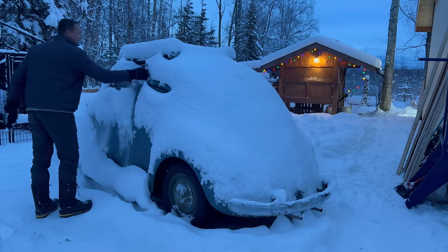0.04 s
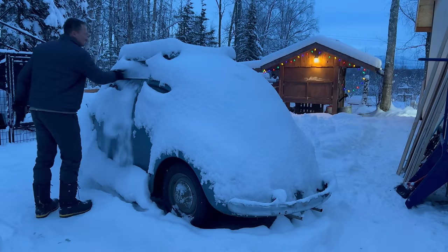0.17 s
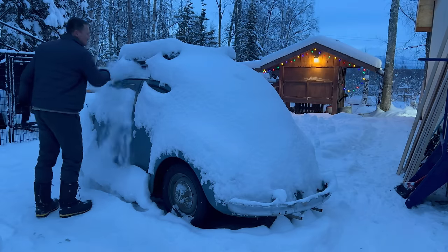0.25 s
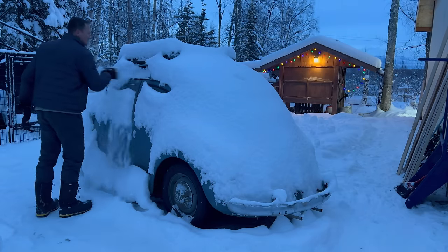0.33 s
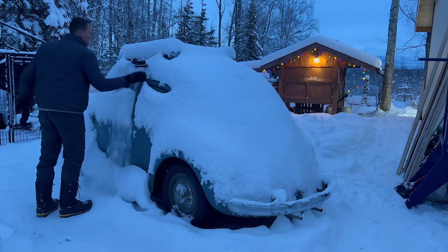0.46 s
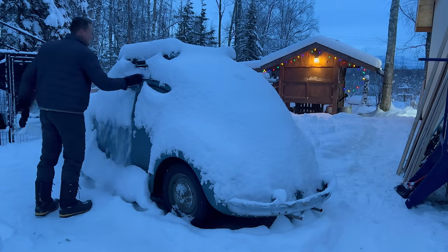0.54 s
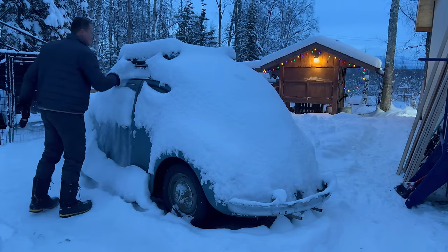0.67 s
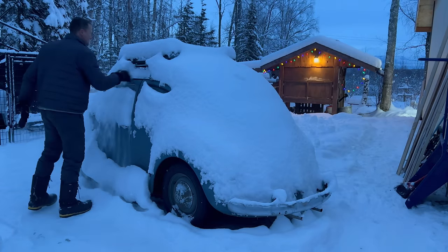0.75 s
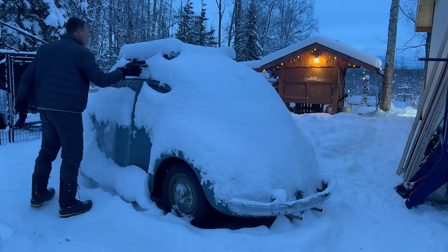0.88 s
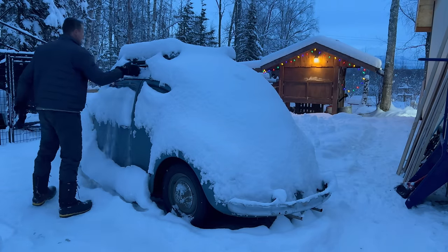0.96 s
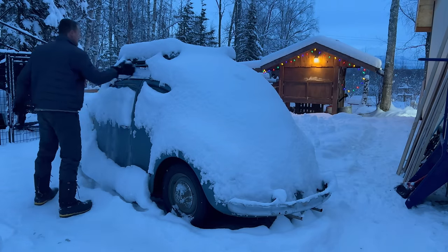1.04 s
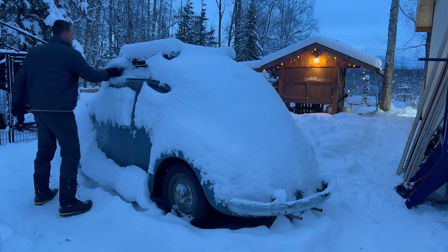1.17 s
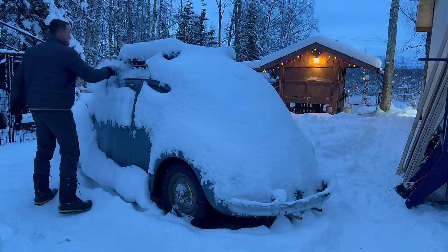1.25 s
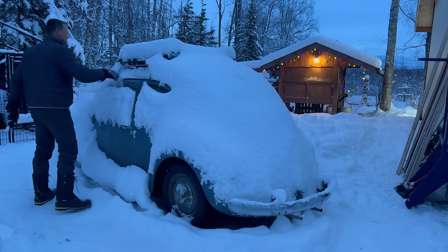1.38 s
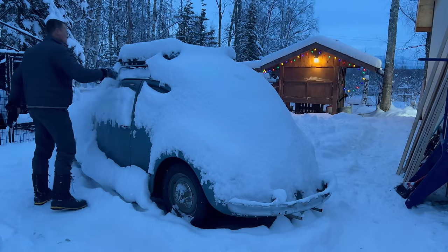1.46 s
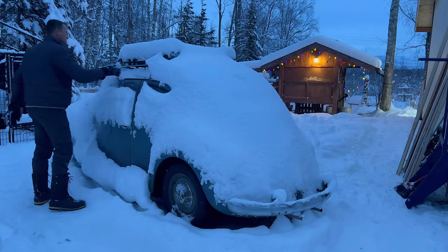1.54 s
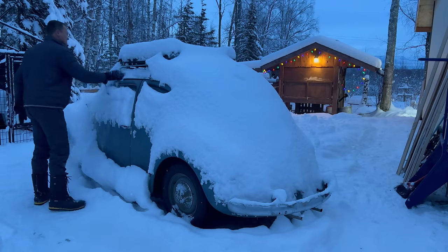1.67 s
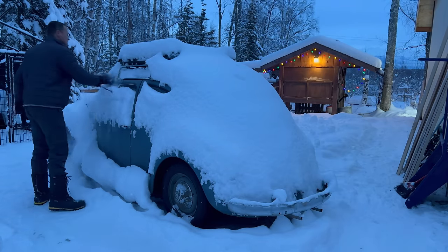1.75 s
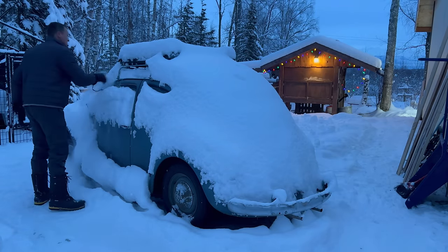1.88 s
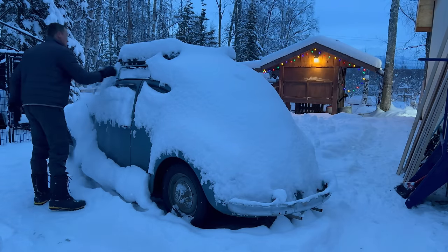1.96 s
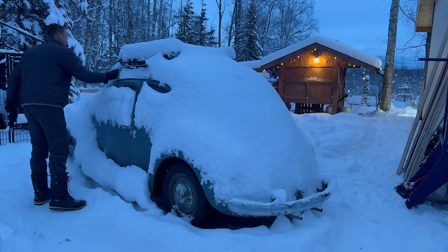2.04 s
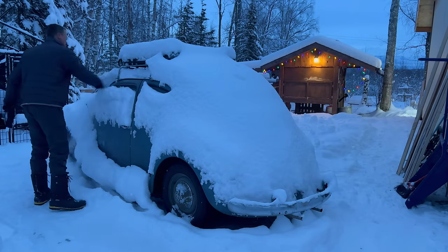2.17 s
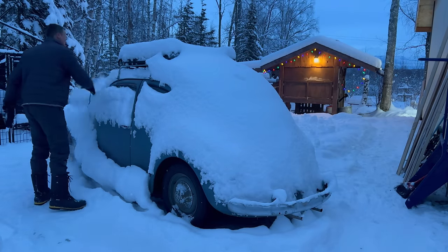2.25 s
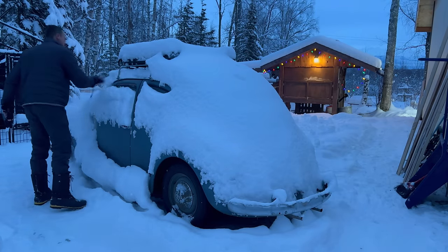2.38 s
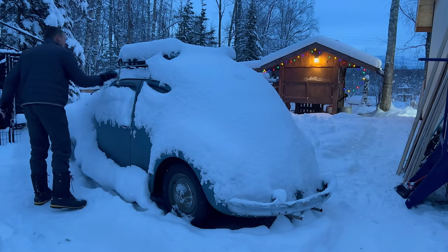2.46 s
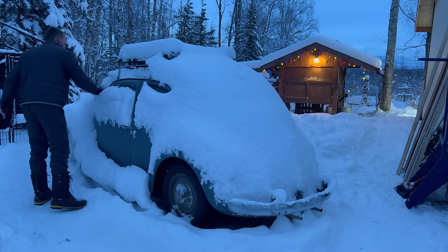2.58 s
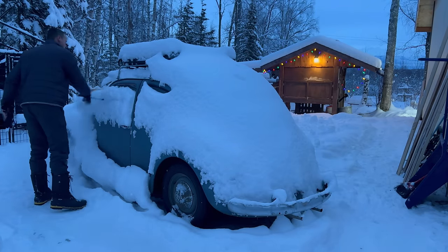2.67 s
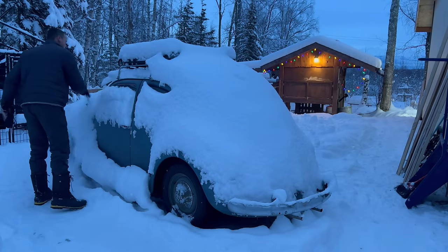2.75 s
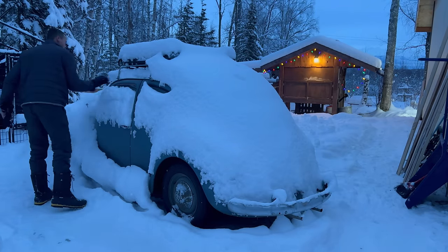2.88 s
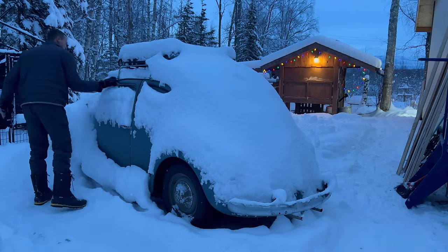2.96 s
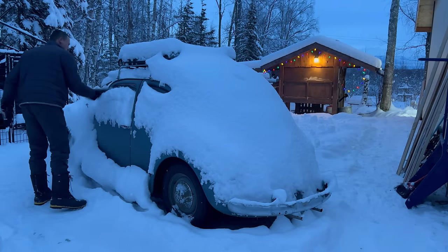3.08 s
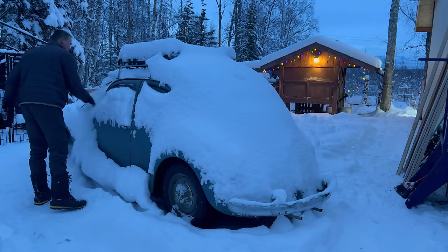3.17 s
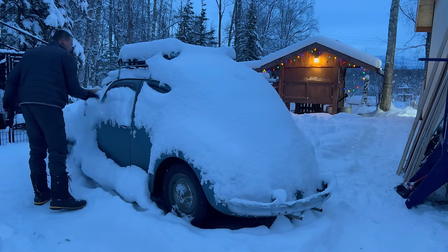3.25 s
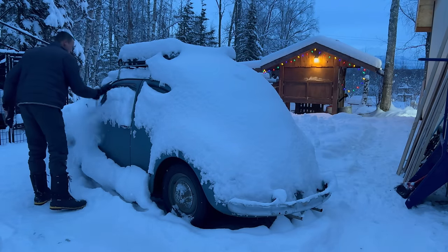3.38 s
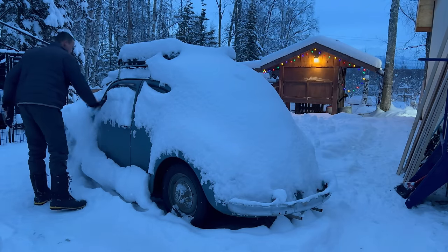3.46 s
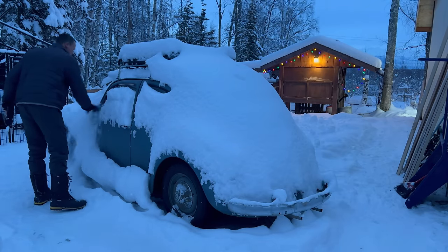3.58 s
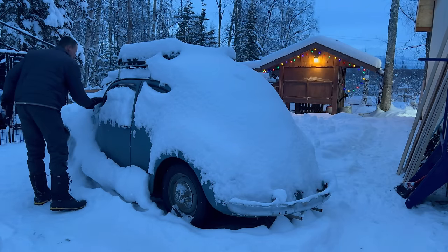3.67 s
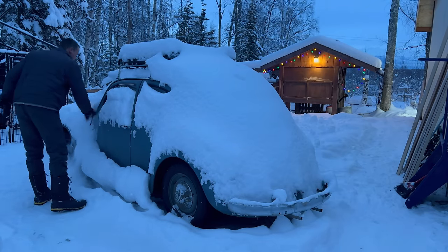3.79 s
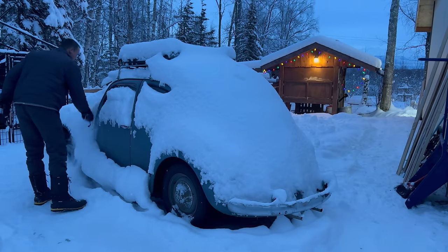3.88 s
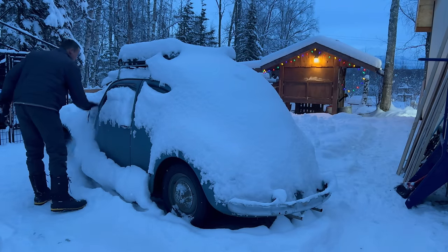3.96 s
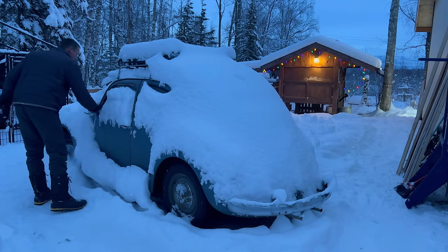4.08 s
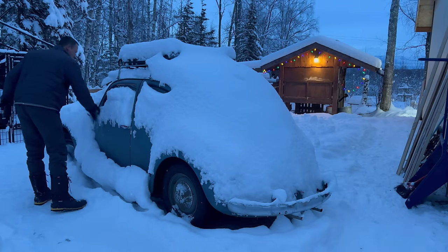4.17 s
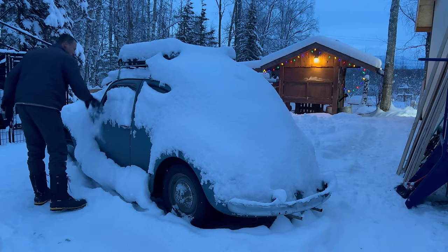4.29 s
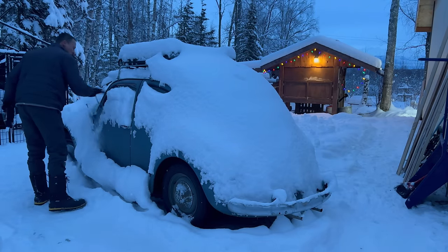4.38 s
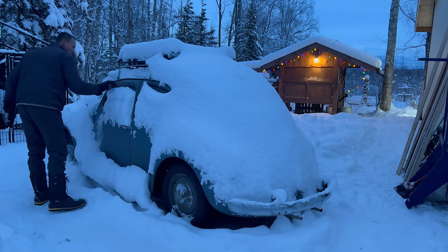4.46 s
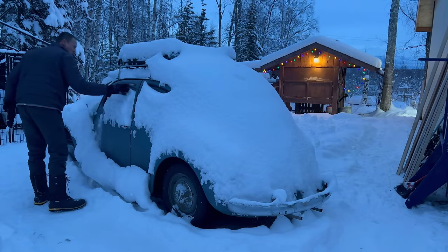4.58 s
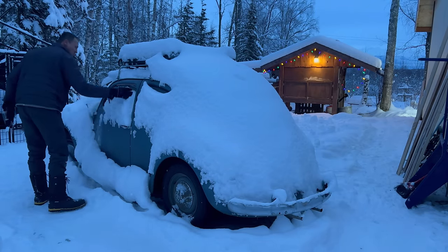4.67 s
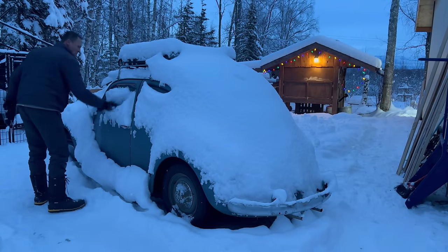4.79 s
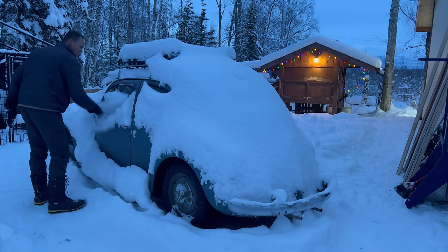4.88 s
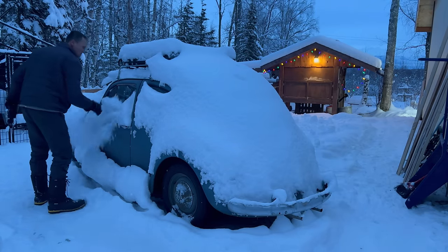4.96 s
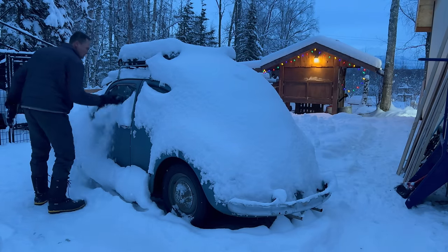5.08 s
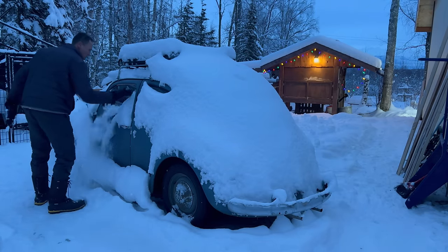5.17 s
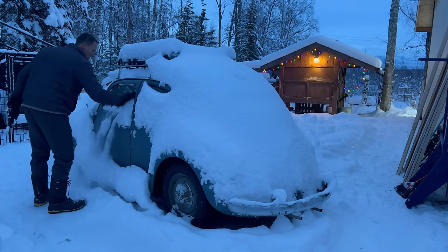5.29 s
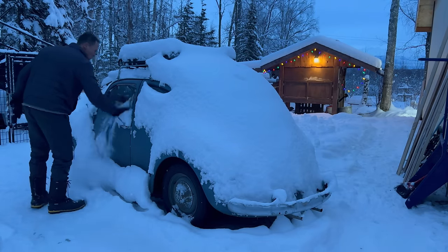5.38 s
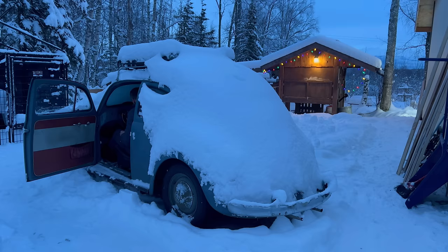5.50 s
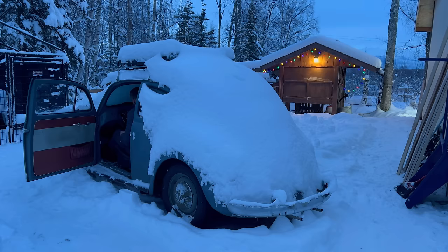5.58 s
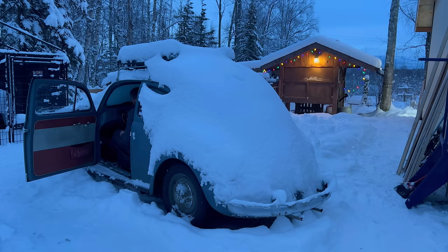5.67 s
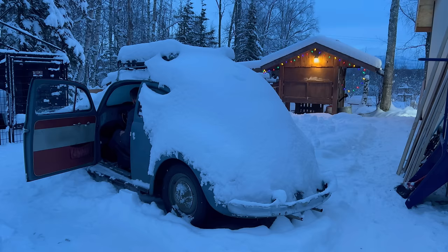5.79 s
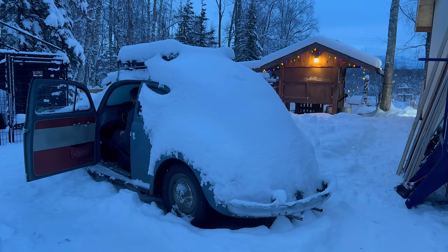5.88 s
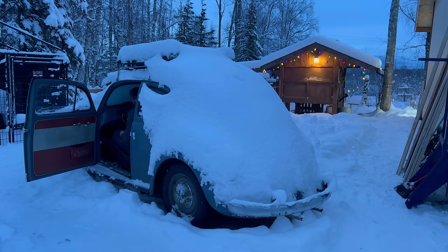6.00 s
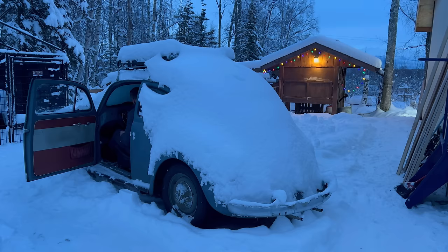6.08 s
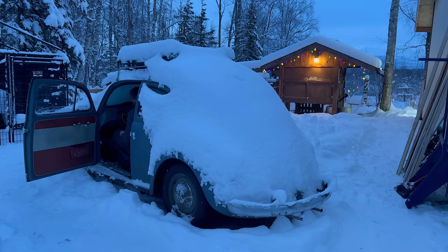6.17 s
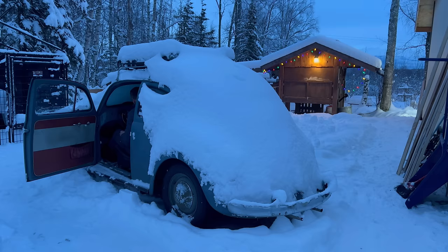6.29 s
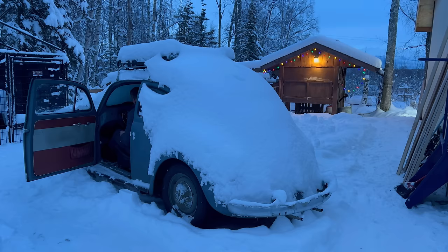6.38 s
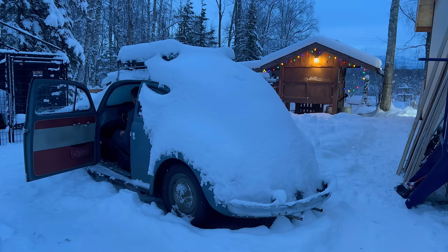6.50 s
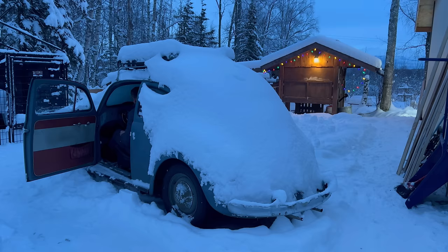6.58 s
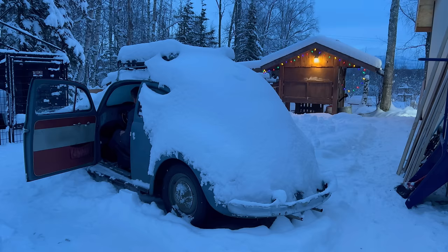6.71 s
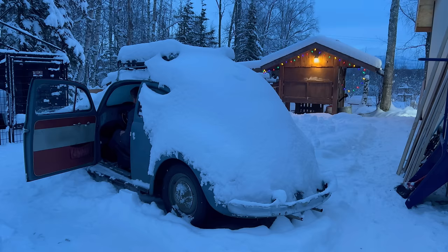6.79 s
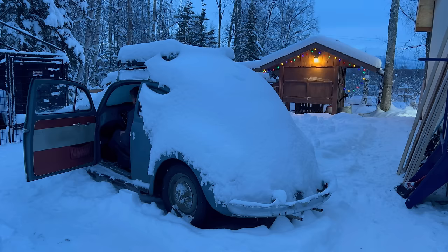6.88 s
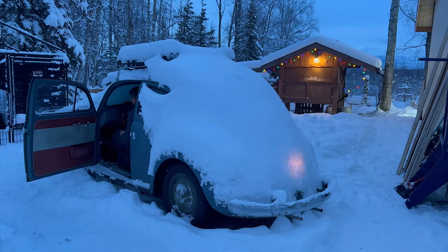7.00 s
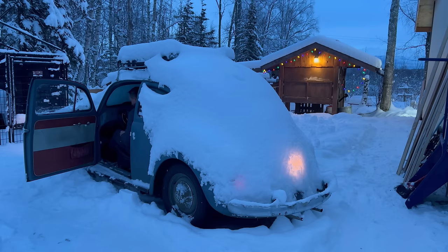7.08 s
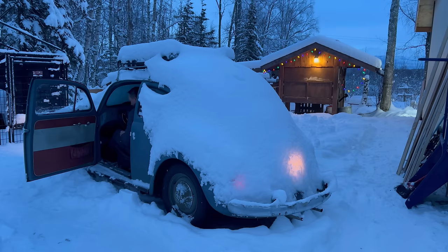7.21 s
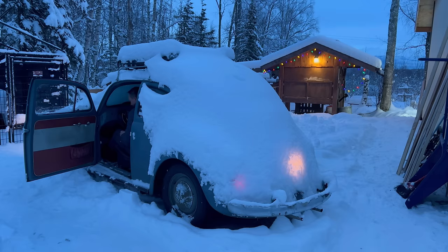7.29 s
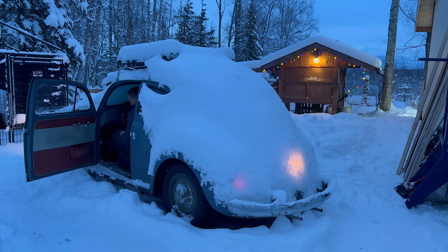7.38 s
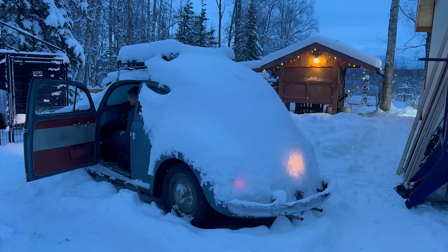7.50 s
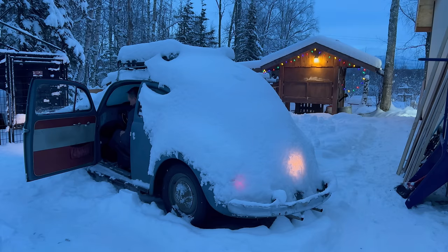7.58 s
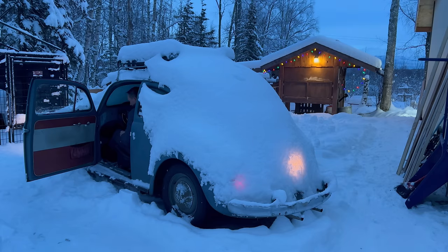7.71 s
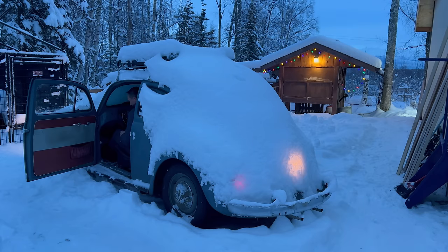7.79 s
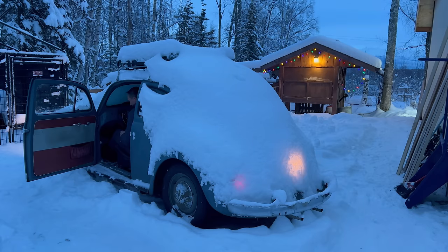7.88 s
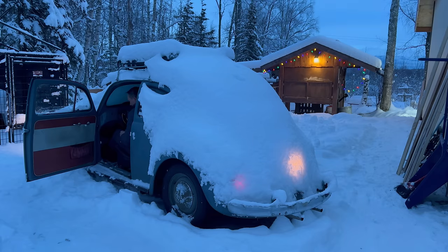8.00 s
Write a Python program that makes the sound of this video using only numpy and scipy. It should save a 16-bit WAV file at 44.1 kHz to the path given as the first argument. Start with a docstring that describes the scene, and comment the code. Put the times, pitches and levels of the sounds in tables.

```python
"""A gloved hand sweeps frozen snow off a car roof: shaped noise hisses and crunches, short swings snap,
falling tones thud on the panels. After a jump in time the driver shifts in the seat (noise and creaks),
keys jingle as ringing tones, and the starter engages and grinds through compressions as ringing noise.
Far traffic is soft noise over a low wavering hum. Hand and cabin are to the left, the engine ahead."""
import sys
import numpy as np
from scipy import signal
from scipy.fft import rfft, irfft, next_fast_len
from scipy.io import wavfile
from scipy.ndimage import uniform_filter1d, map_coordinates

SR = 44100
rng = np.random.default_rng(int(sys.argv[2]) if len(sys.argv) > 2 else 0)


def wav_record(signal):
    """Record a signal, one row per channel, as 16-bit PCM in the file named by sys.argv[1]."""
    frames = np.transpose(np.atleast_2d(signal))
    bounded = np.clip(frames, -1, 1)
    # unit amplitude maps onto the largest positive 16-bit level
    quanta = np.round(bounded * 32767).astype(np.int16)
    wavfile.write(sys.argv[1], SR, quanta)


N = 354784

# Glove strokes; rise and fall are times per 20 dB, and a rise below 1 ms counts as 1 ms.
# Columns: full_contact_s, hold_ms, rise_ms, fall_ms, powder_hiss_db, crust_crunch_db, panel_push_db
STROKES = [(.055, 7.2, 128, 157, -44, -51, -59), (.14, 54, 75, 25, -42, -40.5, -48.5),
           (.222, 1.5, 15, 42, -52, -64, -48), (.34, 13, 67, 211.5, -56.5, -65.5, -77.5),
           (.515, 4.7, -3, 69, -47.5, -88, -61.5), (.58, 3.9, 41, 91, -37, -37.5, -39),
           (.595, 0.77, -2, 12, -30, -39, -40.5), (.845, 2.5, 41, 99, -61.5, -72, -71.5),
           (1.036, 12, 53, 201, -52.5, -53, -65), (1.15, 22, 109, 46.5, -54.5, -58.5, -51.5),
           (1.26, 6.8, 26, 148, -67, -61.5, -50.5), (1.445, 4.9, 93, 297, -63.5, -62.5, -54),
           (1.655, 8.9, -1, 79, -75, -77, -54.5), (1.742, 2.1, 55, 63, -37.5, -44, -46),
           (2.1, 12, 154, 90, -56.5, -61, -53.5), (2.155, 2.4, 45, 49.5, -43, -44.5, -67),
           (2.326, 6.2, 11, 81, -57, -69, -58), (2.554, 78, 56, 43.5, -48, -54.5, -56.5),
           (2.724, 5.7, 100, 84, -60.5, -60.5, -59), (2.825, 4.6, 39, 53, -60.5, -71, -62),
           (3.025, 13, 24, 96, -61.5, -71, -73), (3.09, 7.9, 104, 142, -53.5, -55.5, -48),
           (3.464, 51, 82, 85, -44, -51, -46), (3.4, 10, 0, 76, -62.5, -66, -56),
           (3.7, 24, 48, 69, -67, -67, -65.5), (3.772, 71, 76, 68, -44.5, -53.5, -50.5),
           (4.12, 32, 42, 95, -45.5, -47, -43.5), (4.386, 3.9, 96, 99, -81, -62.5, -58),
           (4.56, 8.6, 104, 60, -68.5, -72, -64), (4.672, 8, 3, 68, -63, -56, -81.5),
           (4.83, 2.6, 149, 64, -54, -52, -49), (4.93, 40, 80.5, 204, -62.5, -66.5, -56),
           (5.03, 140, 54, 48, -62, -63, -47), (5.288, 174, 145, 48, -48.5, -56, -53),
           (5.405, 8, 8, 47, -62.5, -53, -58), (5.472, 13.3, 33, 41, -49.5, -50.5, -40)]
# Tone colour of loose powder, breaking crust and the push on the panel.
# Columns: pitch_hz, relative_level_db
POWDER_COLOUR = [(2500, -41.5), (4500, -7), (6500, -5.5), (8800, -0.7), (10500, -3), (12500, -11),
                 (15500, -3.5)]
CRUST_COLOUR = [(250, -21), (600, 4), (1200, 3), (2800, -2), (4000, -5), (7000, -30)]
PUSH_COLOUR = [(25, -27), (55, 1.5), (160, -5), (350, -7), (700, -14.5), (1500, -40)]
# Snow trickling between strokes, ever less of it: level and change per second of hiss, crunch, push
REST_DB, REST_DB_PER_S = [-70.5, -78.5, -53], [-5, -0.9, -0.62]
JUMP_S = 5.497  # the sweeping ends here


def sweeping():
    """Powder hisses off the sleeve, crust crunches, the panel rumbles under the push."""
    t = np.arange(N) / SR
    trickle = amp(np.c_[REST_DB] + np.c_[REST_DB_PER_S] * t)
    hiss, crunch, push = (swells(STROKES) + trickle) * (t < JUMP_S)
    powder = hiss * grit(colour(POWDER_COLOUR), 700, lumpy_db=2.0, spiky_db=-3.0)
    crust = crunch * grit(colour(CRUST_COLOUR), 320, lumpy_db=2.5, spiky_db=4.5)
    panel = push * grit(colour(PUSH_COLOUR), 60, lumpy_db=1.2)
    return powder + crust + panel


# Snow crust breaking, then the starter's pinion slamming into mesh and taking up slack.
# Columns: start_s, level_db, bright_tick_level_db
CRUST_SNAPS = [(0.038, -36.5, -32), (0.143, -32, -37.5), (0.1514, -23.5, -32), (0.5165, -41, -35),
               (0.551, -33, -33), (0.5696, -30.5, -40), (0.5938, -15, -7), (0.5985, -19, -34.5),
               (.602, -22, -39.5), (0.8107, -44.5, -42), (0.8444, -63, -49.5), (1.0176, -34.5, -41.5),
               (1.0342, -40, -42.5), (1.0695, -29, -36), (1.1667, -36.5, -32), (1.1695, -34.5, -36),
               (1.2585, -36, -55), (1.6544, -61, -56), (1.7183, -38, -44), (1.741, -43, -26.5),
               (2.146, -29.5, -40.5), (2.156, -25.5, -31.5), (2.296, -64, -46.5), (2.325, -56, -33.5),
               (2.5784, -34.5, -36), (2.6857, -40, -50), (2.7155, -33, -52), (2.9245, -42.5, -60),
               (2.9745, -42.5, -55), (3.0548, -34.5, -40.5), (3.0835, -32.5, -38), (3.0875, -29, -40.5),
               (3.4186, -35, -41), (3.452, -34, -51.5), (3.4585, -30.5, -38), (3.492, -36, -44),
               (3.4999, -26.5, -37), (3.508, -30, -43), (3.7338, -46, -43), (3.77, -37, -39.5),
               (3.819, -38, -43), (3.836, -43, -30), (3.856, -45, -48), (4.086, -47, -55),
               (4.1085, -31, -33), (4.119, -24, -32.5), (4.6766, -33.5, -51), (4.809, -39, -47),
               (4.832, -30, -36), (4.846, -46, -52), (5.2774, -41, -31.5), (5.4061, -33.5, -42),
               (5.412, -32.5, -46.5), (5.4717, -28, -35)]
PINION_CLICKS = [(7.1666, -41, -47), (7.1738, -23.5, -42), (7.1804, -23.5, -41), (7.192, -27.5, -34),
                 (7.1954, -40, -36.5), (7.2144, -30, -38), (7.3744, -44, -63), (7.5594, -43, -53),
                 (7.59, -43, -54), (7.755, -47.5, -60), (7.912, -42, -63), (7.946, -40, -62)]


def snaps(table, puff_t60_s, centre_hz):
    """Each click is one sharp swing near the centre pitch, a bright tick and a short puff."""
    track, t = np.zeros(N), np.arange(SR // 20) / SR

    def swing(hz, loss_db):
        """A tone that loses loss_db in every cycle."""
        return np.sin(2 * np.pi * hz * t) * amp(-loss_db * hz * t)

    for s, db, tick_db in table:
        hz = centre_hz * np.exp(.12 * rng.standard_normal())
        puff = unit(signal.lfilter(*signal.iirpeak(hz, 1.2, SR), rng.standard_normal(len(t))))
        puff = puff * amp(-60 * t / puff_t60_s)
        fizz = np.diff(rng.standard_normal(len(t) + 1)) * amp(-60 * t / .008)
        body = 1.35 * swing(hz, loss_db=17.0) + 0.18 * puff
        tick = swing(8700, loss_db=3.5) + .08 * fizz
        add(track, s, amp(db) * body + amp(tick_db) * tick)
    return scattered(track, 0.062)


# Thuds: the hand on the panels, then the driver in the seat, then the engine's jolts.
# Columns: start_s, level_db, first_pitch_hz, last_pitch_hz, time_to_fall_60_db_s
BLOWS = [(0.145, -32, 354, 323.4, 0.19), (0.181, -29, 355, 330, 0.073), (0.2465, -33, 200, 115, 0.08),
         (0.556, -37.5, 406, 100, 0.068), (0.589, -33, 203, 70.6, 0.13), (0.885, -37.5, 738, 216, 0.093),
         (1.019, -39.5, 590, 302, 0.024), (1.1685, -25, 446, 127, 0.11), (1.260, -38, 520, 173, 0.13),
         (1.72, -31.5, 203, 163, 0.15), (2.721, -42.5, 635, 627, 0.095), (3.082, -40, 405, 95, 0.031),
         (3.366, -40.5, 670, 300, 0.038), (3.448, -37, 300, 62.5, 0.28), (3.524, -30, 150, 115, 0.17),
         (3.8335, -33, 600, 250, .03), (3.891, -41.5, 690, 366, 0.097), (4.108, -38, 400, 300, 0.036),
         (4.128, -34, 199, 139, .12), (4.151, -32.5, 110, 80, 0.079), (4.733, -45, 505, 250, 0.046),
         (4.809, -36.5, 199, 68, 0.23), (4.862, -41, 500, 250, .04), (5.010, -42, 680, 350, 0.043),
         (5.034, -39, 596, 300, 0.045), (5.075, -38.5, 550, 280, .04), (5.1, -36, 520, 125, 0.041),
         (5.131, -43.5, 600, 300, .03), (5.166, -35.5, 620, 160, 0.075), (5.335, -36.5, 128, 89.4, 0.038),
         (5.448, -38, 150, 75.5, 0.093), (5.858, -56, 380, 345, 0.17), (6.497, -48.5, 201, 155, 0.22),
         (7.199, -29, 300, 170, 0.05), (7.2072, -26.5, 230, 150, 0.065), (7.2181, -27, 160, 95, 0.067),
         (7.238, -36.5, 250, 150, 0.09), (7.276, -43, 111, 75, .3), (7.488, -34.5, 200, 62, 0.22),
         (7.614, -33.5, 150, 99, 0.073), (7.781, -44.5, 149, 90, 0.075), (7.842, -37, 60, 48, 0.15),
         (7.948, -29, 172, 103, 0.091)]
DULL = 0.24  # share of unpitched thump in a blow


def blows(from_s, until_s):
    """Each thud falls in pitch, as sheet metal carries the high pitch first, over a dull noise thump."""
    track, t = np.zeros(N), np.arange(SR // 4) / SR
    for s, db, start_hz, end_hz, t60 in BLOWS:
        if not from_s <= s < until_s:
            continue
        hz = end_hz + (start_hz - end_hz) * np.exp(-t / .006)
        band = signal.butter(2, [end_hz, 1.6 * start_hz], 'bandpass', fs=SR, output='sos')
        thump = unit(signal.sosfilt(band, rng.standard_normal(len(t))))
        thump = thump * (1 - np.exp(-t / 0.0049))
        tone = np.sin(2 * np.pi * np.cumsum(hz) / SR)
        add(track, s, amp(db - 60 * t / t60) * (tone + DULL * thump))
    return scattered(track, 0.032)


# The driver shifting in the seat; rise and fall are times per 20 dB, a rise below 1 ms counts as 1 ms.
# Columns: full_contact_s, hold_ms, rise_ms, fall_ms, cloth_rustle_db, cover_crackle_db
SHIFTS = [(5.668, 2, 10, 43, -78, -92), (5.804, 34, 94, 51.5, -86, -72), (5.856, 36, 16, 52, -79, -57.5),
          (5.93, 4.4, 20, 83.5, -96, -83), (6.145, 10.4, 26, 57, -72, -61), (6.228, 27, 16, 110, -76, -74),
          (6.5, 16, 36, 107, -73.5, -70), (6.754, 3, 25, 75, -71.5, -77), (6.76, 91, 152, 100, -76.5, -81),
          (6.81, 3, -7, 40, -70, -81), (6.876, 2.6, 48, 111.5, -72, -83), (7.135, 8, 34, 12, -85, -76)]
# The seat frame, dash and lock taking load.
# Columns: start_s, level_db (before a 2 dB lift), pitch_hz
CREAKS = [(5.669, -75, 3440), (5.856, -50, 2850), (5.862, -57, 2000), (5.869, -49.5, 1400),
          (5.931, -74, 2770), (6.11, -72.5, 2300), (6.134, -56, 2800), (6.15, -53, 657), (6.157, -59, 1100),
          (6.195, -66, 950), (6.228, -68, 2200), (6.232, -59, 657), (6.255, -67, 2250), (6.477, -65, 2300),
          (6.493, -57.5, 2200), (6.511, -62, 1390), (6.702, -74, 2200), (6.751, -72, 2200),
          (6.764, -71, 2390), (6.8, -62.5, 1720), (6.808, -65, 2250), (6.84, -67, 2200), (6.865, -65, 2200),
          (6.896, -65.5, 3380), (6.9, -68, 2200), (7.126, -62.5, 2420), (7.14, -73, 2780)]
# Ringing pitches of the cabin fittings, each retuned a little at every creak.
# Columns: pitch_hz, relative_level_db, time_to_fall_60_db_s
CABIN = [(655, 0, 0.15), (954, -5, .08), (1370, -7, .05), (1704, -3, .05), (2233, -1, 0.06),
         (2415, -5, .035), (2830, 0, 0.034), (3430, 3, 0.038)]
WEIGHT_DB = 4  # low rumble of the seat cushion over the crackle of its cover
RATTLE_T60_S, RATTLE = 0.043, 0.49  # time to fall 60 dB; share of rattle in a creak
REACH_DB = 25  # loss of a fitting one octave off the creak's pitch


def seat():
    """Cloth rubs, the cold cover crackles, and sudden creaks ring the cabin fittings nearest in pitch."""
    rustle, crackle = swells(SHIFTS)
    creaks, t = np.zeros(N), np.arange(SR // 5) / SR
    for s, db, near_hz in CREAKS:
        ring = 0
        for hz, level, t60 in CABIN:
            ring_db = level - REACH_DB * abs(np.log2(hz / near_hz)) + rng.normal(0, 1.34)
            retuned_hz = hz * (1 + .022 * rng.standard_normal())
            ring = ring + amp(ring_db - 60 * t / t60) * np.sin(2 * np.pi * retuned_hz * t)
        ring = ring * (1 - np.exp(-t / 0.0016))
        rattle = unit(signal.lfilter(*signal.iirpeak(near_hz, 1.3, SR), rng.standard_normal(len(t))))
        rattle = rattle * amp(-60 * t / RATTLE_T60_S)
        add(creaks, s, amp(db + 2) * (ring + RATTLE * rattle))
    cloth = rustle * grit(colour(POWDER_COLOUR), 500, lumpy_db=3.0)
    cushion = amp(WEIGHT_DB) * grit(colour(PUSH_COLOUR), 60, lumpy_db=2.5)
    cover = crackle * (grit(colour(CRUST_COLOUR), 340, lumpy_db=2.5) + cushion)
    return cloth + cover + scattered(creaks, 0.039)


# Key contacts.
# Columns: start_s, tick_db, fob_db, ring_db, key_db
JINGLE = [(6.684, -67.5, -92.5, -79, -75), (6.704, -59, -92.5, -66.5, -57.5), (6.75, -64.5, -90, -68, -60),
          (6.779, -68.5, -91, -80, -74.5), (6.812, -63.5, -65, -55, -61), (6.839, -64, -59, -62, -49),
          (6.88, -64, -74, -74, -59), (6.983, -74, -99, -78.5, -67), (7.006, -67, -99, -69.5, -63),
          (7.085, -65, -99, -80, -77)]
# Ringing pitches of the three parts in turn: fob, ring, key.
# Columns: pitch_hz, relative_level_db, time_to_fall_60_db_s
KEY_PARTS = ([(5330, 2, .17)], [(7050, -1, .05), (7714, -3, .06), (8230, -3, .07), (9450, -5, .05),
             (10912, 2, .06)], [(14205, 0, .17)])
FOB_TAIL_DB, FOB_TAIL_T60_S = -18, .4  # the fob's faint afterring


def keys():
    """Each contact ticks and rings fob, ring and key at its own strengths; the fob swells slowly."""
    track, t = np.zeros(N), np.arange(SR // 3) / SR
    fob_t60 = KEY_PARTS[0][0][2]
    # dividing out the fob's own fading leaves a tail with a longer one
    lasting = 1 + amp(FOB_TAIL_DB + 60 * t / fob_t60 - 60 * t / FOB_TAIL_T60_S)
    for s, tick_db, *parts_db in JINGLE:
        rings = []
        for db, modes in zip(parts_db, KEY_PARTS):
            sound = 0
            for hz, level, t60 in modes:
                fading = amp(db + level + rng.normal(0, 4.5) - 60 * t / t60)
                sound = sound + fading * np.sin(2 * np.pi * (hz * t + rng.random()))
            rings.append(sound)
        fob, ring, key = rings
        fob = fob * lasting * (1 - np.exp(-t / 0.02)) ** 2
        tick = amp(tick_db - 60 * t / .01) * 0.66 * np.diff(rng.standard_normal(len(t) + 1))
        add(track, s, fob + ring + key + tick)
    return scattered(track, 0.032)


# The starter shaft thrown in, then the load taken; rise and fall are times per 20 dB.
# Columns: start_s, hold_ms, rise_ms, fall_ms, housing_drone_db, gear_grind_db, air_and_brush_hiss_db
ENGAGE = [(7.176, 16, 20, 59, -53.5, -43, -43), (7.204, 7.4, 22, 129, -42, -47.5, -55)]
# Steady levels under the compressions: housing_drone_db, gear_grind_db, air_and_brush_hiss_db
RUNNING_DB = [-56, -56.5, -80]
# Each compression: air hisses first, the gear labours after it.
# Columns: hiss_start_s, hold_ms, housing_drone_db, gear_grind_db, air_and_brush_hiss_db
COMPRESSIONS = [(7.349, 89.3, -56.5, -59, -64), (7.562, 85.5, -47, -50.5, -60),
                (7.73, 69.3, -50.5, -60.5, -60.5), (7.893, 74.6, -46, -56, -57.5)]
# Resonances of the starter housing, the gear and the bell housing around it.
# Columns: pitch_hz, width_hz, relative_level_db
HOUSING = [(57.8, 37, -1.5), (152, 110, -1), (274, 43, 0.5), (430, 58, -3.5)]
GEARS = [(820, 56, 1.5), (965, 52, -1.5), (1160, 49, 1), (1260, 83, -3), (620, 200, -8.5),
         (1530, 330, -12.5)]
CASING = [(1990, 180, -1.5), (2530, 140, -3.5), (2980, 260, -0.5), (3810, 140, -5)]
# Tone colour of the brush and air hiss. Columns: pitch_hz, relative_level_db
BRUSH_COLOUR = [(900, 1), (1700, -3), (3000, -5), (4500, -10), (6500, -17), (10000, -19), (12500, -31),
                (15900, -39)]
LOAD_RISE_MS, LOAD_FALL_MS = 26, 77  # per 20 dB
LABOUR_S = 0.032  # delay of drone and grind behind the hiss
CASING_DB, SWAY_DB = -4, 2.0  # whir of the casing; how far each resonance comes and goes


def starter():
    """The housing drones, the gear grinds and the brushes hiss, swelling with each compression."""
    loads = swells([(s, hold_ms, LOAD_RISE_MS, LOAD_FALL_MS, *db) for s, hold_ms, *db in COMPRESSIONS])
    late = np.pad(loads, ((0, 0), (round(LABOUR_S * SR), 0)))[:, :N]
    running = amp(np.c_[RUNNING_DB]) * (np.arange(N) > ENGAGE[0][0] * SR)
    drone, grind, hiss = swells(ENGAGE) + running + [late[0], late[1], loads[2]]
    tone, knocks = teeth()
    mesh = knocks + .8 * amp(3.3 * wobble(180)) * rng.standard_normal(N)

    def swaying(modes, rate):
        """The mesh noise ringing each resonance, all coming and going on their own."""
        rings = 0
        for mode in modes:
            ring = wandering(filtered(mesh, resonant([mode])))
            rings = rings + amp(SWAY_DB * wobble(rate)) * ring
        return unit(rings)

    housing = drone * grit(resonant(HOUSING), 90, lumpy_db=1.2)
    gear = scattered(tone + 0.86 * grind * swaying(GEARS, 30) + chatter(), 0.034)
    # takes the treble off housing and gear
    muffled = filtered(housing + gear, lambda hz: 1 / (1 + 1j * hz / 2200) ** 2)
    whir = amp(CASING_DB) * scattered((hiss + 0.043 * grind) * swaying(CASING, 25), .03)
    brushes = hiss * grit(colour(BRUSH_COLOUR), 400, lumpy_db=1.5)
    return muffled + whir + brushes


# The pinion on the ring gear, its speed thrown about by the compressions.
# Columns: time_s, teeth_per_s, level_db
MESH = [(7.24, 185, -53.5), (7.3, 207, -54), (7.379, 214, -56.5), (7.501, 204, -48.5), (7.56, 218, -50),
        (7.64, 214, -60), (7.665, 288, -49.5), (7.703, 290, -38), (7.72, 265, -60), (7.79, 244, -48),
        (7.859, 285, -54), (7.905, 198, -53.5), (7.971, 210, -60), (8.04, 156, -55)]


def teeth():
    """One uneven knock per tooth: its rate is heard as a growl, and the knocks ring the gear."""
    s, rate, db = np.transpose(MESH)
    t = np.arange(N) / SR
    tooth_count = np.cumsum(np.interp(t, s, rate) * (1 + .035 * wobble(60))) / SR
    knocks = np.diff(np.floor(tooth_count), prepend=0) * amp(2.5 * rng.standard_normal(N))
    level = amp(np.interp(t, s, db) + 2.7 * wobble(45)) * (t > s[0])
    octave = 0.22 * amp(2.3 * wobble(25)) * np.sin(4 * np.pi * tooth_count)
    tone = np.sin(2 * np.pi * tooth_count) + octave
    return level * np.sqrt(2) * tone, unit(knocks)


# Bursts of tooth chatter that set one gear pitch singing.
# Columns: start_s, level_db, pitch_hz
CHATTER = [(7.293, -47, 784), (7.372, -37.5, 831), (7.572, -45, 1160), (7.6, -46, 800), (7.632, -37.5, 813),
           (7.644, -44, 1150), (7.676, -40.5, 1153), (7.929, -44, 1240), (7.985, -47, 813)]
CHATTER_RISE_S, CHATTER_T60_S = .005, 0.1


def chatter():
    """Each burst swells quickly and rings out roughly."""
    track, t = np.zeros(N), np.arange(SR // 8) / SR
    for s, db, hz in CHATTER:
        rough = 1 + .3 * unit(uniform_filter1d(rng.standard_normal(len(t)), size=120))
        envelope = amp(db - 60 * t / CHATTER_T60_S) * (1 - np.exp(-t / CHATTER_RISE_S))
        add(track, s, envelope * rough * np.sin(2 * np.pi * hz * t))
    return track


WANDER_MS = .6  # typical swing of the delay


def wandering(x):
    """Play in the mounts bends the ringing up and down: a slowly changing delay shifts the pitch."""
    n = np.arange(N)
    return np.interp(n + WANDER_MS * SR / 1000 * wobble(16), n, x)


# Tone colour of far traffic. Columns: pitch_hz, relative_level_db
TRAFFIC_COLOUR = [(20, -44.5), (45, -13), (68, -6.5), (76, 5), (86, -10), (160, -8), (300, -13), (700, -18),
                  (900, -23.5), (1300, -35), (2500, -45), (8000, -53.5), (16000, -61.5)]
# Columns: time_s, level_db
YARD_LEVEL = [(0, -55.5), (5.495, -51.5), (5.5, -60.5), (8.1, -62.5)]


def yard():
    """Far traffic: low, soft noise that barely flickers."""
    level = amp(np.interp(np.arange(N) / SR, *np.transpose(YARD_LEVEL)))
    return level * grit(colour(TRAFFIC_COLOUR), 7.5, lumpy_db=0.6)


HUM_HZ, HUM_DB, HUM_OCTAVE_DB = 76.5, -64.5, -8.5  # middle pitch and level; octave against the tone


def hum():
    """A low tone and its octave, drifting in pitch and level."""
    turns = np.cumsum(HUM_HZ * (1 + 0.041 * wobble(6.5))) / SR
    level = amp(HUM_DB + 4 * wobble(16))
    octave = amp(HUM_OCTAVE_DB + 4 * wobble(11)) * np.sin(4 * np.pi * turns)
    return level * (np.sin(2 * np.pi * turns) + octave)


# How left and right hear each direction: along the roof, left, ahead and all around.
# Columns: pitch_hz, left_lead_radians, left_over_right_db, likeness_0_to_1
ROOF = [(0, 0, -0.5, 1), (349, 0.32, -0.5, 0.9), (990, 1.5, 3.5, 1), (1688, 1.24, 2.5, 0.56),
        (2660, 1.4, 3, 0.41), (3940, 2, 1, 0.68), (4900, 4.5, 7.5, 0.61), (6370, 3.5, -0.5, 0.93),
        (7200, 4, 1.8, 0.55), (8190, 5.5, -1.5, 0.47)]
LEFT = [(0, -1, 0.5, 1), (150, 0.28, -1, 1), (343, 0.67, -0.9, 0.9), (1040, 1, 6, 0.7),
        (1650, 1.05, 4, 0.23), (3880, 3.5, 3, 0.74), (4970, 5.5, 5.5, 0.7), (5770, 4.5, 1, 0.8),
        (7340, 5.5, -1, 1), (8500, 5, 0, 1)]
AHEAD = [(0, 0.54, 0, 1), (1710, 0.16, -2, 0.84), (3360, 1, 1.5, 0.9), (5500, -0.65, -3, 0.24),
         (6900, 0.94, .1, 0.5), (8000, -0.66, .1, 0.94)]
AROUND = [(0, 0.4, 4, 1), (120, 0.47, -0.9, 0.98), (304, -1, -0.5, 0.47), (640, 4, 1.5, 0.91),
          (1486, 1.1, 5.5, .2), (5000, 1, 3.5, 0.18), (7200, -0.4, 13, .5), (8160, -0.5, 10.5, .4)]
# Left-right relation of the treble, shared by all directions; same columns.
TREBLE = [(9300, -2.4, 1.5, .85), (9700, -3.14, 0, 1), (10500, -3.3, 0, 1), (12000, -4.9, -.5, .6),
          (13100, -6.28, 0, 1), (13700, -6.28, 0, 1), (14800, -7.7, -.2, .75), (16000, -8.6, 0, .7)]


def heard(pair, direction):
    """Left and right channel: a shared part with lead and shading, and an unshared part."""
    f, lead, shade_db, alike = np.transpose(direction + TREBLE)

    def turn(hz):
        """Angle that splits the pair into shared and unshared parts."""
        return np.arccos(np.clip(np.interp(hz, f, alike), 0, 1)) / 2

    def half(hz):
        """Half of the lead and shading; the right channel gets the opposite half."""
        shade = amp(np.interp(hz, f, shade_db) / 2)
        return shade * np.exp(.5j * np.interp(hz, f, np.unwrap(lead)))

    mid, side = filtered(pair, lambda hz: [np.cos(turn(hz)), np.sin(turn(hz))])
    return filtered(np.array([mid + side, mid - side]), lambda hz: [half(hz), 1 / half(hz)])


def scattered(x, t60):
    """A dry sound and a copy smeared by a short noise tail, which widens it."""
    t = np.arange(SR // 10) / SR
    smear = rng.standard_normal(len(t)) * amp(-60 * t / t60)
    return np.array([x, signal.fftconvolve(x, smear / np.linalg.norm(smear))[:N]])


def grit(response, rate, lumpy_db, spiky_db=0):
    """Two unrelated noises under one flicker: slow lumps, and rare hard grains (dips if spiky_db < 0)."""
    lumps_db = lumpy_db * (wobble(rate) + wobble(rate / 7))
    spikes_db = spiky_db * np.minimum(rng.exponential(size=N), 5)
    noises = amp(lumps_db + spikes_db) * rng.standard_normal((2, N))
    return unit(filtered(noises, response))


def swells(rows):
    """One gain track per level column: each row rises, holds and falls."""
    tracks = 0
    ms = np.arange(0, N + 8, 8) / SR * 1000  # every eighth sample is enough
    for s, hold_ms, rise_ms, fall_ms, *levels_db in rows:
        since = ms - s * 1000
        before = -since / max(rise_ms, 1)
        after = (since - hold_ms) / max(fall_ms, 1)
        under_db = 20 * np.maximum(0, np.maximum(before, after))
        tracks = tracks + amp(np.c_[levels_db]) * amp(-under_db)
    return np.repeat(tracks, 8, axis=1)[:, :N]


def wobble(rate):
    """A smooth random curve, rate knots a second."""
    knots = rng.standard_normal(int(N * rate / SR) + 4)
    return map_coordinates(knots, [np.arange(N) * rate / SR])


def colour(points):
    """Gain drawn through (Hz, dB) points on a log pitch axis."""
    f, db = np.transpose(points)
    return lambda hz: amp(np.interp(np.log(hz + 1), np.log(f), db, -120, db[-1]))


def resonant(modes):
    """Response of a few resonances, every other one flipped in sign."""
    def response(f):
        total = 0
        for k, (c, w, db) in enumerate(modes):
            total = total + (-1) ** k * amp(db) * 1j * f * w / (c * c - f * f + 1j * f * w)
        return total
    return response


def filtered(x, response):
    """x times a complex response of frequency."""
    m = next_fast_len(N + 8192)  # spare room for the ringing
    return irfft(rfft(x, m) * response(np.fft.rfftfreq(m, 1 / SR)), m)[..., :N]


def add(track, s, sound):
    """Lay a sound on the track at time s."""
    part = track[round(s * SR):][:len(sound)]
    part += sound[:len(part)]


def amp(db):
    """Decibels to gain."""
    return 10 ** (np.asarray(db) / 20)


def unit(x):
    """Scaled to an rms of 1."""
    return x / np.sqrt(np.mean(x ** 2) + 1e-20)


def scene():
    """Every source from its own direction; the first strokes reach far along the roof."""
    hand = sweeping() + snaps(CRUST_SNAPS, .034, centre_hz=1930) + blows(0, 7)
    far = np.arange(N) < .9 * SR
    engine = starter() + blows(7, 9) + snaps(PINION_CLICKS, 0.027, centre_hz=1410)
    roof = heard(hand * far, ROOF)
    left = heard(hand * ~far + seat() + keys(), LEFT)
    return roof + left + heard(engine, AHEAD) + heard(yard(), AROUND) + hum()


def record(dry):
    """Nothing is kept from 15850 Hz upward."""
    return filtered(dry, lambda hz: hz < 15850)


dry = scene()
out = record(dry)
wav_record(out)
```